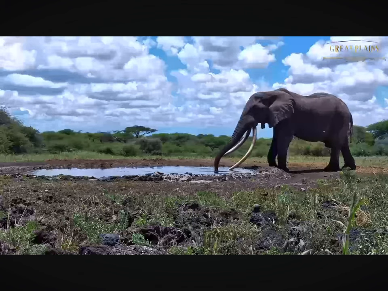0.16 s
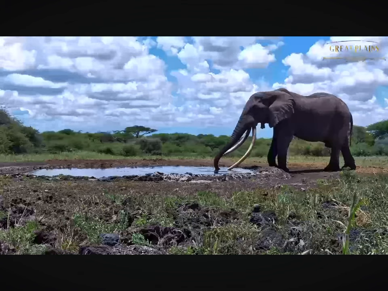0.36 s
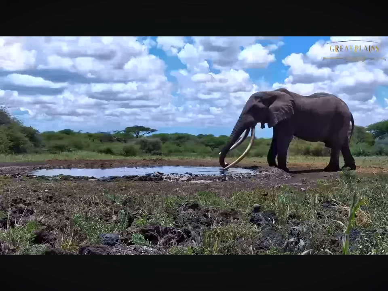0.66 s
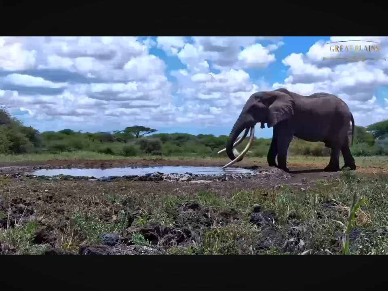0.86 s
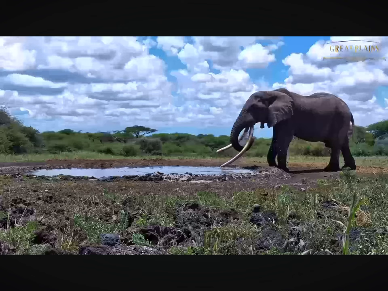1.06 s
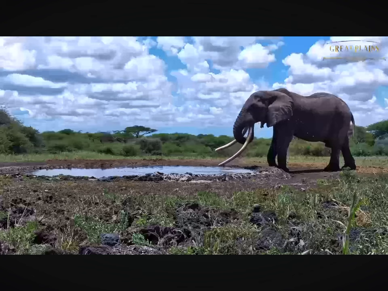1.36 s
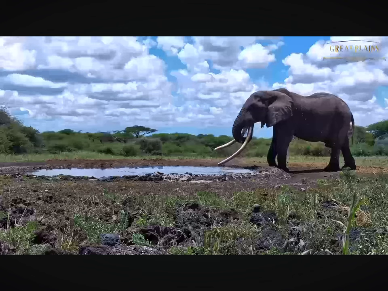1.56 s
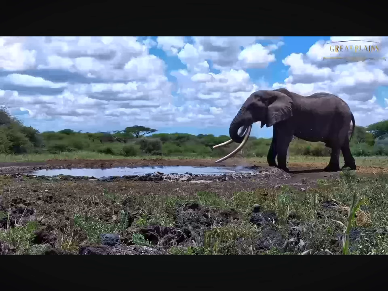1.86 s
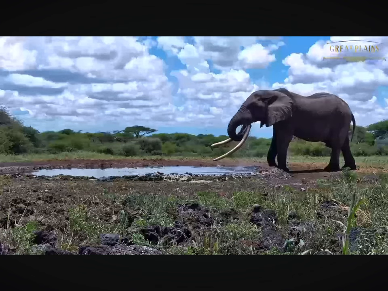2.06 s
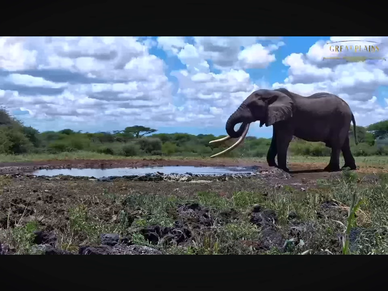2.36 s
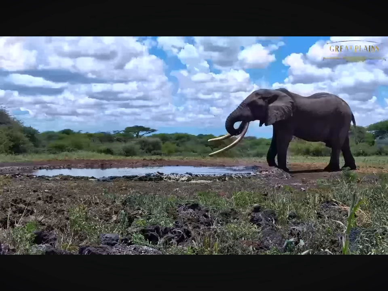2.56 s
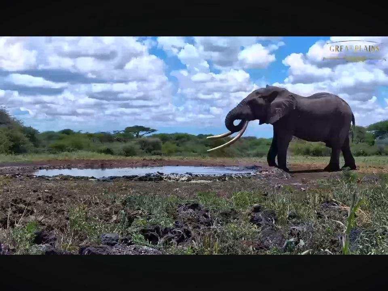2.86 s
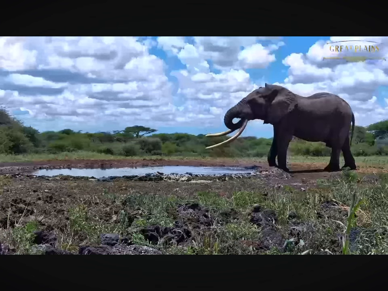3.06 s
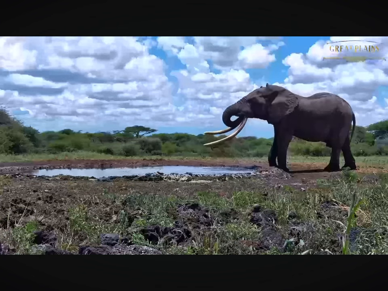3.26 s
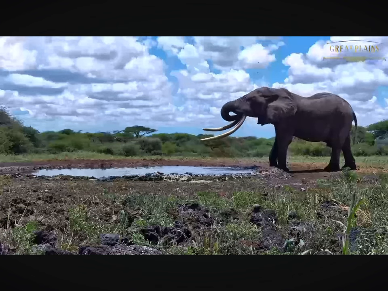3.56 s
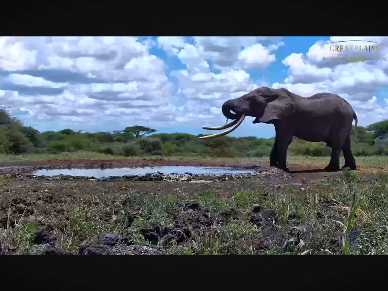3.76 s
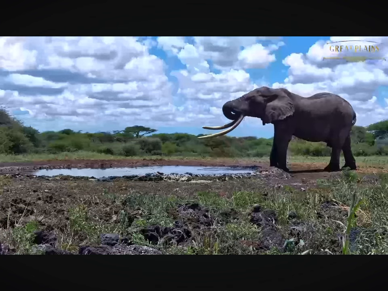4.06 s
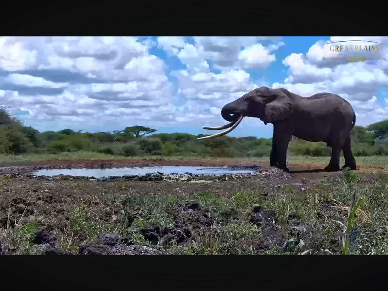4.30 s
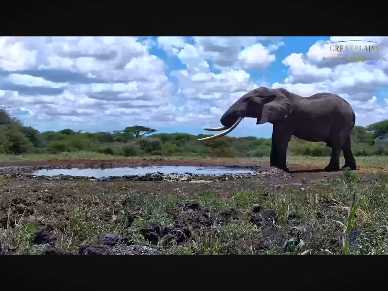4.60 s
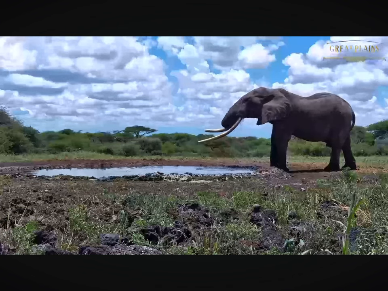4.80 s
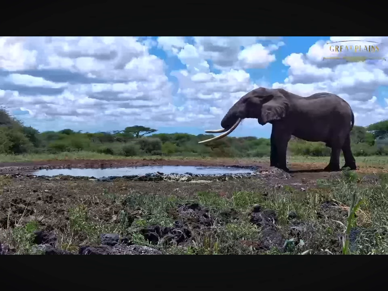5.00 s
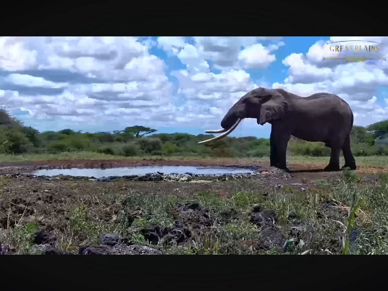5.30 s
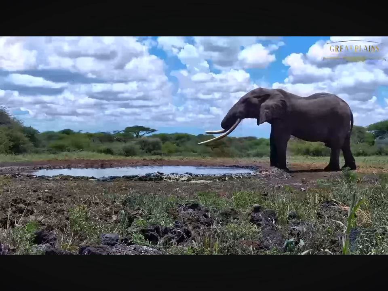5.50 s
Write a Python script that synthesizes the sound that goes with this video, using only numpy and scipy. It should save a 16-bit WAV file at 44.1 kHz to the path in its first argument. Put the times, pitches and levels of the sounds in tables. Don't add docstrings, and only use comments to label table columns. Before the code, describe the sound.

Quiet open air with electrical hiss and low hum, two short dove notes and a bright drip. Water from an elephant's trunk trickles, then pours in crackling sheets with plops around two seconds, eases to dribbles and soft knocks, and ends with wet gurgling. The sound is mono, narrow-band, with a ringing, brittle treble.

```python
import sys
import numpy as np
from scipy import signal
from scipy.fft import rfft, irfft, next_fast_len
from scipy.io import wavfile
from scipy.ndimage import uniform_filter1d

SR = 44100
rng = np.random.default_rng(int(sys.argv[2]) if len(sys.argv) > 2 else 0)


def store_pcm(level_fs):
    pcm = np.round(np.clip(level_fs, -1, 1) * 32767).astype(np.int16)
    wavfile.write(sys.argv[1], SR, np.atleast_2d(pcm).T)


def rack_gain(trim_db):
    fader = np.asarray(trim_db, float)
    return 10 ** (fader / 20)


N = 248724
T = np.arange(N) / SR

# [f/Hz, level/dB per Hz]
HISS_SPECTRUM = [(20, -13), (60, 0.5), (300, -3), (800, 2), (3700, -1.5), (6500, -7.5), (7300, -20.5),
                 (7700, -34.5)]
# [order, level/dB rms, lag/cycles]
BUZZ_PARTIALS = [(1, -56, .42), (2, -59, .5), (3, -69, .5), (4, -74, .65), (6, -70, .95), (10, -65, .3),
                 (14, -65, .54), (18, -69, .72), (22, -72, .75), (26, -72, .9), (30, -71, .1),
                 (34, -69, .2), (38, -71, .4)]
# [t/s, f/Hz, level/dB]
COO_NOTES = [
    [(0.02, 690, -69), (0.054, 760, -44.5), (0.07, 820, -46), (0.082, 755, -54), (0.092, 750, -44.5),
     (0.2, 786, -62)],
    [(0.52, 788, -61), (0.542, 694, -56), (0.576, 793, -48), (0.59, 796, -60), (0.6, 774, -61)],
]

# [t/s, churn level/dB, openness/dB, low resonance f/Hz]
TRUNK_CHURN = [
    (4.46, -51, 0, 807),
    (4.5, -41, 0, 747),
    (4.64, -39, 0.5, 718),
    (4.75, -39.5, -0.5, 725),
    (4.88, -35.5, 1.5, 755),
    (5.2, -43.5, 0.5, 673),
    (5.4, -37, 0, 600),
    (5.55, -42, -2, 566),
    (5.64, -42, -5.5, 590),
]
# [f/Hz, width/Hz]
TRUNK_MODES = [
    (1070, 100),
    (1600, 220),
    (1390, 90),
    (430, 160),
    (160, 60),
]
# [t/s, length/s, swell level/dB, openness change/dB]
AIR_SLUGS = [(4.546, 0.024, -4.5, -13.5), (4.598, 0.025, 8, -3), (4.667, 0.025, 3, -2),
             (4.718, 0.017, 4, 10), (4.799, 0.082, 11.5, 1), (4.987, 0.032, 2, -5), (5.09, .03, 4, -1),
             (5.323, 0.018, 4, -2), (5.386, .04, 0.5, -4), (5.491, .04, 5.5, -1), (5.556, 0.013, 3.5, -8),
             (5.591, 0.02, 8, 0)]
# [t/s, length/s, level/dB]
AIR_SQUEAKS = [
    (3.44, 0.28, -41.5),
    (4.469, 0.18, -38.5),
    (5.42, 0.04, -50),
]
# [t/s, peak level/dB, f/Hz, t60/s]
SWALLOWS = [
    (3.19, -51., 150., .3),
    (3.33, -47., 300., .1),
    (3.53, -48., 400., .08),
    (3.6, -56., 140., .2),
    (4.22, -55., 150., .3),
    (4.405, -38., 200., .13),
    (4.41, -42., 330., .09),
    (4.585, -24., 1430., .05),
    (5.16, -50., 150., .4),
]

# [t/s, flow level/dB, coarseness/dB (big over small bubbles),
# share landing in the pool/dB]
LIFT_FLOW = [
    (.62, -70.5, -9, -1),
    (.69, -43.5, -18, -2),
    (.86, -37.5, -22.5, -4.5),
    (1.12, -31.5, -25, 14.5),
    (1.203, -36, -11, 7),
    (1.208, -28.5, -10, 6),
    (1.28, -23.5, -6, -5.5),
    (1.43, -34, 1.5, -6.5),
    (1.81, -31.5, -11, 2.5),
]
SPILL_FLOW = [
    (1.87, -24, -19, -1),
    (1.96, -22, -11.5, -2.5),
    (2.14, -20.5, -11.5, -0.5),
    (2.21, -22, -10.5, -1),
    (2.34, -21.5, -10, -0.5),
    (2.6, -25, -9, -3.5),
    (2.8, -28, -8, -2.5),
    (3.05, -30, -5.5, -4.5),
    (3.24, -38, -5, 9.5),
]
DRIBBLE_FLOW = [
    (3.4, -36, -2.5, 2.5),
    (3.62, -31.5, -6.5, 1),
    (3.85, -35, -6.5, 0),
    (4.0, -32.5, -8.5, -9.5),
    (4.25, -31.5, -6.5, -6),
    (4.42, -35, -10, 6),
    (4.8, -34, -3, 8.5),
    (5.25, -31.5, -7.5, 6.5),
    (5.64, -35, -6.5, 6),
]
# [t/s, crack level/dB, length/s, swell level/dB]
TRUNK_SHEETS = [(0.8825, -18, 0.022, 7), (0.9606, -34, 0.025, 3.5), (1.051, -19, 0.016, 0),
                (1.1325, -24, 0.013, 5), (1.207, -19, 0.014, 4), (1.504, -19, 0.022, -4),
                (1.553, -14.5, 0.019, -0.5), (1.668, -7, 0.011, 6.5), (1.838, -14, 0.026, 7.5),
                (1.868, -9, 0.012, 8.5), (1.8904, -17, 0.028, -2.5), (1.9238, -5, 0.022, 9),
                (2.017, -15, 0.025, 2.5), (2.051, -3, 0.043, 3), (2.124, -6, 0.021, 10),
                (2.2393, -12, 0.027, 7.5), (2.3227, -13.5, 0.028, 3), (2.414, -8, 0.0097, 1.5),
                (2.465, -17, 0.011, 7.5), (2.516, -25, 0.039, 7.5), (2.632, -8.5, 0.0086, 6.5),
                (2.7085, -16, 0.015, 10), (2.8325, -23, 0.032, 2), (2.8593, -19.5, 0.0088, 13),
                (2.897, -18, 0.011, 3), (3.0293, -23, 0.012, 8)]
# [t/s, crack level/dB, length/s, swell level/dB]
LATER_SHEETS = [(3.3142, -25, 0.029, 11), (3.4628, -18, 0.0071, 3.4), (3.715, -22, 0.0055, 2.8),
                (3.8146, -28, 0.0053, 8), (3.9768, -18, 0.027, 5.9), (4.0482, -8, 0.0096, 4.4),
                (4.1805, -12, 0.023, 7.4), (4.2005, -8, 0.015, 3.1), (4.2184, -2, 0.019, 3.4),
                (4.3535, -24, 0.0075, 1.7), (4.4554, -14, 0.011, 3.5), (4.4716, -11.5, 0.018, 2.1),
                (4.575, -9.5, 0.022, 3.5), (4.6214, -13.5, 0.017, 5.3), (4.6633, -6, 0.027, 8.7),
                (4.775, -10, 0.018, 4.0), (4.7935, -13, 0.018, 4.4), (4.8448, -7.5, 0.013, 11),
                (4.9257, -16, 0.017, 3.4), (4.9446, -13, 0.023, 6.1), (5.0235, -7, 0.012, 1.9),
                (5.124, -13, 0.013, 3.4), (5.1473, -18, 0.021, 4.8), (5.1696, -17, 0.023, 4.8),
                (5.195, -14, 0.011, 1.7), (5.2489, -9.5, 0.017, 5.1), (5.3841, -17, 0.04, 4.0),
                (5.4934, -15, 0.02, 3.1), (5.6194, -20, 0.015, 3.6)]
# [t/s, crack level/dB, length/s, swell level/dB]
SMALL_SPURTS = [(0.692, -31, 0.015, 3.5), (0.824, -26, 0.012, 6), (0.91, -26, 0.012, 3),
                (1.023, -22, 0.011, 6), (1.072, -21, 0.012, 4.5), (1.104, -20, 0.012, 4.5),
                (1.188, -31, 0.012, 3.5), (1.9121, -4, 0.012, 8), (2.027, -7, 0.012, 2.5),
                (2.07, -6, 0.012, 2.5), (2.0864, -9, 0.021, 0.5), (2.1456, -5, 0.012, -5.5),
                (2.282, -12, 0.01, -0.5), (2.396, -8, 0.012, 4.5), (2.533, -11, 0.014, 5),
                (2.5694, -15, 0.014, 3), (2.596, -23, 0.019, 1), (2.666, -14, 0.012, 0),
                (2.738, -11, 0.012, 4), (2.953, -21, 0.012, 5), (3.073, -23, 0.012, 5),
                (3.141, -17, 0.012, 5.5), (3.269, -21, 0.013, 2), (3.382, -11, 0.011, 2.5),
                (3.471, -26, 0.012, 2.5), (3.524, -26.5, 0.012, 3), (3.636, -18, 0.012, 3),
                (3.687, -16, 0.012, 8), (3.848, -21, 0.012, 3.5), (3.887, -18, 0.012, 4.5),
                (3.9194, -20, 0.012, 9), (3.942, -15, 0.012, 6.5), (4.021, -25, 0.0092, 3),
                (4.143, -25, 0.011, 3), (4.1544, -14, 0.011, 6), (4.296, -13, 0.012, 4.5),
                (4.414, -17, 0.012, 0), (4.679, -4, 0.0088, 6.5), (4.697, -17, 0.012, 1),
                (4.727, -23, 0.013, 0.5), (4.8165, -9, 0.012, 10), (4.88, -15, 0.012, 3.5),
                (4.968, -17, 0.01, 5), (5.009, -11, 0.012, -3.5), (5.041, -27, 0.0086, 1.5),
                (5.269, -13, 0.012, 6.5), (5.325, -16, 0.012, 6), (5.393, -20, 0.012, 4),
                (5.507, -13, 0.011, 4), (5.5345, -15, 0.012, 0.5)]
# [t/s, peak level/dB]
LONE_DROPS = [(0.9733, -20.4), (1.0519, -18.0), (1.5703, -19.2), (1.6704, -13.0), (1.7193, -18.2),
              (1.8204, -14.8), (1.9931, -10.9), (2.0318, -5.7), (2.0525, -6.0), (2.1717, -6.8),
              (2.526, -7.7), (2.6312, -6.6), (2.7504, -12.0), (2.8075, -13.4), (2.8578, -10.4),
              (2.9952, -16.4), (3.0808, -17.1), (3.1265, -19.4), (3.1367, -17.5), (3.1473, -14.4),
              (3.2161, -21.0), (3.2639, -20.3), (3.4626, -16.9), (3.8007, -20.1), (3.8138, -13.1),
              (3.8319, -22.4), (3.9566, -13.2), (4.008, -17.7), (4.0493, -7.7), (4.102, -17.3),
              (4.1163, -19.6), (4.1355, -18.8), (4.201, -9.0), (4.3264, -16.8), (4.4306, -19.3),
              (4.4555, -17.4), (4.4691, -18.3), (4.4907, -15.8), (4.5317, -22.1), (4.5753, -10.4),
              (4.5906, -16.9), (4.6229, -13.6), (4.7764, -11.0), (4.7946, -13.1), (4.8456, -10.3),
              (4.8555, -11.5), (4.8961, -18.7), (5.0237, -8.1), (5.127, -12.0), (5.172, -13.5),
              (5.1824, -15.0), (5.195, -12.8), (5.211, -11.0), (5.2306, -15.6), (5.2926, -17.0),
              (5.3833, -15.8), (5.4313, -17.1), (5.4937, -14.8), (5.5444, -19.1), (5.6203, -13.1)]
# [t/s, peak level/dB, f/Hz]
PLOP_DROPS = [(1.2096, -32, 2650), (1.2547, -17.5, 1380), (1.4858, -27, 1650), (1.5229, -22, 1580),
              (1.8578, -10.5, 2660), (1.8882, -8.5, 2440), (1.9528, -12, 2480), (2.0526, -21, 1720),
              (2.1683, -15.5, 2410), (2.242, -9, 2720), (2.3225, -22, 2480), (2.4172, -10.5, 1650),
              (2.4651, -28, 2600), (2.5155, -14.5, 1510), (2.5756, -9, 1450), (2.6297, -18, 2820),
              (2.707, -27, 2400), (2.7484, -11.5, 1166), (2.8528, -13, 1590), (3.3218, -20, 1390),
              (3.7174, -25, 2660), (3.8134, -9.5, 2440), (4.049, -11.5, 2600), (4.152, -16.5, 1460),
              (4.2006, -10, 2370), (4.2302, -16, 2530), (4.281, -19, 1680), (4.5748, -13, 2600),
              (4.751, -17.5, 1630), (4.794, -17, 1090)]
# [t/s, peak level/dB, f/Hz]
GLUG_BUBBLES = [(0.67, -50, 750), (0.78, -40, 1340), (0.857, -46.0, 810), (0.912, -44.0, 1600),
                (1.142, -38, 1640), (1.144, -38, 2710), (1.651, -23.5, 1380), (1.716, -36, 840),
                (1.735, -30, 1520), (1.856, -26, 1790), (1.856, -22, 2510), (1.95, -20, 2530),
                (1.959, -31.5, 685), (2.141, -23.0, 1580), (2.204, -33.0, 940), (2.245, -19, 1630),
                (2.269, -28.5, 670), (2.356, -35.5, 760), (2.394, -27, 980), (2.464, -32.0, 930),
                (2.524, -19, 1440), (2.529, -36, 775), (2.528, -21, 2340), (2.596, -30, 900),
                (2.628, -21.0, 2060), (2.706, -22, 1400), (2.904, -33, 610), (3.041, -23, 2170),
                (3.055, -39, 700), (3.222, -37, 780), (3.335, -29, 1430), (3.372, -33, 2420),
                (3.47, -27, 2430), (3.524, -23.5, 2320), (3.633, -29.0, 2790), (3.712, -37, 1660),
                (3.718, -29.0, 2710), (3.762, -39, 1550), (3.898, -27.0, 2580), (3.959, -33, 1530),
                (4.047, -22, 2660), (4.051, -34, 1540), (4.198, -22, 1490), (4.197, -23, 2700),
                (4.236, -21, 2520), (4.449, -38, 745), (4.537, -26.5, 720), (4.584, -23.5, 725),
                (4.652, -25, 1510), (5.169, -28, 2490), (5.274, -28.0, 1400), (5.32, -31, 600),
                (5.381, -27, 2360), (5.458, -27, 2580)]
# [t/s, peak level/dB, f/Hz, t60/s]
DRIPS = [
    (.461, -35., 3570, .035),
    (.548, -47., 3900, .03),
    (.772, -40., 1420, .06),
    (.788, -41., 1290, .05),
    (3.325, -24., 1460, .06),
    (3.866, -31., 810, .07),
    (3.97, -36., 720, .07),
]
# [lowest f/Hz, highest f/Hz, ring/cycles, rate/per s, size spread/dB, share of gushing]
BUBBLE_FAMILIES = [
    (2900, 5477, 5.5, 7000, 4, 0.66),
    (5670, 8600, 7.9, 8900, 5, 0.4),
    (1167, 1900, 4.7, 2500, 2.5, 0.4),
    (535.2, 1280, 6.6, 840, 4.5, 0.36),
    (1991, 2850, 4.6, 2500, 3.5, 0.46),
]
# [offset level/dB, share of coarseness, share of pool]
FAMILY_FOLLOW = [
    (0, 0.0085, .01),
    (-13, 0.058, .01),
    (0.95, 1.137, 0.12),
    (-8.5, 1.2, 1),
    (-2.5, 0.36, .01),
]

# [f/Hz, width/Hz, level/dB over the direct path]
PORT_MODES = [
    (3790, 360, 12),
    (3730, 48, 9),
    (4346, 350, 8),
]
# [f/Hz, level/dB]
TOP_EDGE = [(6200, 0.5), (7000, -5), (7450, -17.5), (7700, -28), (7900, -41)]
# [t/s, length/s]
DEEP_MUTES = [(0.988, 0.039), (1.661, 0.066), (1.83, 0.064), (1.924, 0.137), (2.094, 0.04), (2.379, 0.138),
              (2.623, 0.036), (2.695, 0.065), (2.892, 0.034), (3.03, 0.034), (3.124, 0.06), (3.345, 0.133),
              (3.554, 0.04), (3.626, 0.024), (3.797, 0.111), (3.94, 0.08), (4.106, 0.046), (4.178, 0.044),
              (4.253, 0.136), (4.417, 0.051), (4.614, 0.063), (4.759, 0.041), (4.829, 0.041),
              (4.928, 0.057), (5.016, 0.045), (5.087, 0.166), (5.378, 0.115)]
# [t/s, length/s]
SHALLOW_MUTES = [(0.258, .03), (0.68, .015), (0.865, 0.023), (1.06, 0.023), (1.51, 0.032), (.05, .02),
                 (1.102, 0.016), (1.61, .02), (2.81, 0.019), (3.494, .025)]

CRACK_HZ, CRACK_SPREAD = 3840, 0.019


def evened(x):
    return x / np.sqrt(np.mean(x ** 2) + 1e-20)


def coloured(x, points):
    f, db = np.transpose(points)
    size = next_fast_len(N + 4096)
    hz = np.fft.rfftfreq(size, 1 / SR)
    gain = rack_gain(np.interp(np.log(hz + 1), np.log(f + 1), db))
    return irfft(rfft(x, size) * gain, size)[:N]


def add(mix, s, sound):
    part = mix[round(s * SR):][:len(sound)]
    part += sound[:len(part)]


def resonate(x, hz, width_hz):
    r = np.exp(-np.pi * width_hz / SR)
    if np.isscalar(hz):
        return 2 * signal.lfilter([1 - r], [1, -r * np.exp(2j * np.pi * hz / SR)], x).real
    turn = np.exp(2j * np.pi * np.cumsum(hz) / SR)
    return 2 * (turn * signal.lfilter([1 - r], [1, -r], x / turn)).real


def port(x):
    return x + sum(rack_gain(db) * resonate(x, hz, width_hz) for hz, width_hz, db in PORT_MODES)


def gushes(per_s, t60):
    hits = rng.exponential(1, N) * (rng.random(N) < per_s / SR)
    decay = np.exp(-2 * np.log(1000) / (t60 * SR))
    power = signal.lfilter([1], [1, -decay], hits)
    return power / power.mean()


def bubble(hz, cycles, rise, seconds=0.026):
    t = np.arange(round(seconds * SR)) / SR
    life = t * hz / cycles
    tone = np.sin(2 * np.pi * hz * t * (1 + rise * np.minimum(life, 4)))
    return tone * np.exp(-life) * np.minimum(t * hz * 2, 1)


def ringing(hz, t60, rise, seconds=0.026):
    return bubble(hz, t60 * hz / np.log(1000), rise, seconds)


def hiss_and_buzz():
    hiss = rack_gain(-48.5) * evened(coloured(rng.standard_normal(N), HISS_SPECTRUM))
    half_mains_hz = 25.01
    buzz = np.zeros(N)
    for order, db, lag in BUZZ_PARTIALS:
        buzz += np.sqrt(2) * rack_gain(db) * np.cos(2 * np.pi * (order * half_mains_hz * T - lag))
    return hiss + buzz


def dove():
    out = np.zeros(N)
    for rows in COO_NOTES:
        s, hz, db = np.transpose(rows)
        t = np.arange(s[0], s[-1], 1 / SR)
        phase = 2 * np.pi * np.cumsum(np.interp(t, s, hz)) / SR
        note = np.sin(phase) * signal.windows.tukey(len(t), .15)
        add(out, s[0], np.sqrt(2) * rack_gain(np.interp(t, s, db)) * note)
    echo = evened(resonate(rng.standard_normal(N), 680.0, 90.)) * np.exp(-T / 0.72)
    return out + rack_gain(-56.0) * echo


def gurgle():
    s, *columns = np.transpose(TRUNK_CHURN)
    churn_db, open_db, low_hz = (np.interp(T, s, column) for column in columns)
    for at, length, swell_db, change_db in AIR_SLUGS:
        slug = np.hanning(round(2 * length * SR))
        add(churn_db, at - length, swell_db * slug)
        add(open_db, at - length, change_db * slug)

    drive = rng.standard_normal(N) * np.sqrt(1.0 + 0.22 * gushes(per_s=120.0, t60=0.13))
    middle, upper, beside, deep, chest = (
        evened(resonate(resonate(drive, hz, 1.5 * w), hz, 1.5 * w)) for hz, w in TRUNK_MODES)
    low = evened(resonate(resonate(drive, low_hz, 160), low_hz, 260))

    middle_db = -2.5 - 1.5 * (T - s[0])
    out = rack_gain(-7.0 - 1.32 * open_db) * low
    out += rack_gain(middle_db + 0.23 * open_db) * middle
    out += rack_gain(open_db - 2.5) * (upper + 0.51 * beside)
    out = rack_gain(churn_db) * out + rack_gain(-59.5) * chest
    out += rack_gain(-44 - 10 * ((T - 4.856) / 0.28) ** 2) * deep
    out *= T > s[0]

    for at, length, db in AIR_SQUEAKS:
        size = round(length * SR)
        add(out, at, rack_gain(db) * signal.windows.tukey(size, .4) * middle[round(at * SR):][:size])
    for at, db, hz, t60 in SWALLOWS:
        add(out, at, rack_gain(db) * ringing(hz, t60, 0.012, seconds=.3))
    return out


def flow():
    rows = list(LIFT_FLOW) + list(SPILL_FLOW) + list(DRIBBLE_FLOW)
    s, flow_db, coarse_db, pool_db = np.transpose(rows)
    return np.interp(T, s, flow_db, left=-90), np.interp(T, s, coarse_db), np.interp(T, s, pool_db)


def drips():
    out = np.zeros(N)
    for s, db, hz, t60 in DRIPS:
        add(out, s, rack_gain(db) * ringing(hz, t60, 0.0069, seconds=.08))
    for s, db, hz in GLUG_BUBBLES:
        add(out, s, rack_gain(db) * bubble(hz, 5 * np.sqrt(hz / 1000), .02, seconds=.04))
    return out


def plops():
    out = np.zeros(N)
    for s, db, hz in PLOP_DROPS:
        snap = bubble(1.7 * hz, 0.4, .01) - 1.3 * bubble(0.65 * hz, 0.6, .01)
        add(out, s, rack_gain(db - 8) * snap)
        add(out, s, rack_gain(db - 8.5) * ringing(hz, 0.03, 0.031))
        add(out, s, rack_gain(db - 5) * bubble(1.15 * hz, 1.3, .01))
    return out


def crack(hz, cycles):
    x = bubble(hz, cycles, 0.012)
    x += 0.27 * bubble(2.1 * hz, 0.83, 0.009)
    x += .5 * bubble(1.1 * hz, 6.5, 0.0057)
    return x / abs(x).max()


def patter():
    out, flow_db = np.zeros(N), flow()[0]
    gap, a, b, c = rng.random((200, 4)).T
    times = LIFT_FLOW[0][0] - np.cumsum(np.log(1 - gap)) / 12
    for s, a, b, c in zip(times[times < N / SR - .01], a, b, c):
        db = flow_db[round(s * SR)] + 8 + 2 * (2 * c - 1)
        hz = CRACK_HZ * (1 + 1.1 * CRACK_SPREAD * (2 * a - 1))
        add(out, s, rack_gain(db) * crack(hz, 2.3 + 10.0 * b))
    return out


def landings():
    out, rows = np.zeros(N), list(TRUNK_SHEETS) + list(LATER_SHEETS)
    for (s, db, *_), (a, b) in zip(rows, rng.random((len(rows), 2))):
        if min(abs(s - at) for at, _ in LONE_DROPS) > .004:
            hz = CRACK_HZ * (1 + CRACK_SPREAD * (2 * a - 1))
            add(out, s + .0003, rack_gain(min(db, -9) - 3.) * crack(hz, 1.2 + 4 * b))
    for s, db, *_ in SMALL_SPURTS:
        add(out, s + .0005, rack_gain(db - 7.5) * crack(CRACK_HZ, 2.7))
    return out


def lone_drops():
    out = np.zeros(N)
    for (s, db), (a, b, c) in zip(LONE_DROPS, rng.random((len(LONE_DROPS), 3))):
        hz = CRACK_HZ * (1 + .08 * (2 * a - 1))
        x = bubble(hz, .8 + 2.6 * b, 0.0092, seconds=.005)
        x += .5 * bubble((1.2 + .5 * c) * hz, 0.93, .01, seconds=.005)
        x += 0.11 * bubble(.66 * hz, 1.5, .01, seconds=.005)
        x += .3 * bubble(CRACK_HZ, 5.0, .001, seconds=.005)
        add(out, s - .00015, rack_gain(db - .8) * x / abs(x).max())
    return out


def bubble_shower(low_hz, high_hz, cycles, per_s, spread_db, count=16):
    size = rack_gain(spread_db * np.minimum(rng.exponential(1, N), 4.5))
    size = size * (rng.random(N) < per_s / SR) * rng.choice([-1, 1], N)
    which, jitter = rng.integers(0, count, N), rng.random((count, 2))
    out = np.zeros(N)
    for k, hz in enumerate(np.geomspace(low_hz, high_hz, count)):
        a, b = jitter[k]
        shape = bubble(hz, cycles * (0.31 + 2.5 * a ** 2), 0.0843 * b)
        out += signal.oaconvolve(size * (which == k), evened(shape))[:N]
    return out


def clumping():
    clump_db = np.zeros(N)
    for s, _, length, db in list(TRUNK_SHEETS) + list(LATER_SHEETS) + list(SMALL_SPURTS):
        life = np.linspace(0, 1, round(2.2 * max(length, .003) * SR))
        add(clump_db, s - .001, 1.19 * db * np.minimum(life / .03, 1) * (1 - life))
        add(clump_db, s - .017, -4.5 * np.linspace(0, 1, round(.016 * SR)))
    for s, _ in LONE_DROPS:
        add(clump_db, s - .006, -4. * np.linspace(0, 1, round(.007 * SR)))
    return clump_db


def falling_water():
    clump_db = clumping()
    flow_db, coarse_db, pool_db = flow()
    shared, out = gushes(per_s=42.0, t60=0.069), np.zeros(N)
    for (*sizes, gushing), (offset_db, coarse, pool) in zip(BUBBLE_FAMILIES, FAMILY_FOLLOW):
        gush = 1 + 0.25 * shared + .35 * gushes(per_s=60., t60=0.08)
        swell = (np.sqrt(gush) * rack_gain(clump_db)) ** gushing
        shower = port(bubble_shower(*sizes) * swell)
        out += evened(shower) * rack_gain(flow_db + offset_db + coarse * coarse_db + pool * pool_db)
    return out


def off_the_ground(fall):
    bounce = rack_gain(-19.5) * np.roll(fall, round(0.001228 * SR))
    return evened(fall + bounce) * np.std(fall)


def scene():
    drops = drips() + plops() + patter() + landings() + lone_drops()
    near = gurgle() + drops + off_the_ground(falling_water())
    return (hiss_and_buzz() + dove() + coloured(near, TOP_EDGE))[None]


def fir(x, cut_hz, **shape):
    return signal.oaconvolve(x, signal.firwin(601, cut_hz, fs=SR, **shape)[None], "same")


def mute_band(x):
    keep = np.ones(N)
    mutes = [(*row, -33.5) for row in DEEP_MUTES] + [(*row, -15.5) for row in SHALLOW_MUTES]
    for s, length, db in mutes:
        span = length + .04
        fade = signal.windows.tukey(round(span * SR), min(.09 / span, 1))
        add(keep, s - .02, (rack_gain(db) - 1) * fade)
    band = fir(x, (5400, 5900), pass_zero=False)
    return x + (np.clip(keep, 0, 1) - 1) * band


def step_edge(x):
    lean, rich = (fir(x, hz, window=("kaiser", 9)) for hz in (7560, 7880))
    block = 1024
    loud_db = 10 * np.log10(uniform_filter1d(lean[0] ** 2, block)[::block] + 1e-12)
    opened = loud_db + 9. * rng.standard_normal(len(loud_db)) > -30.
    share = np.repeat(1. * opened, block)[:N]
    share = uniform_filter1d(uniform_filter1d(share, block // 2), block // 2)
    return lean + share * (rich - lean)


def low_pass(x):
    return signal.sosfilt(signal.butter(12, 7870, fs=SR, output="sos"), x)


def record(dry):
    mix = step_edge(mute_band(dry))
    return low_pass(mix)


dry = scene()
out = record(dry)
store_pcm(out)
```